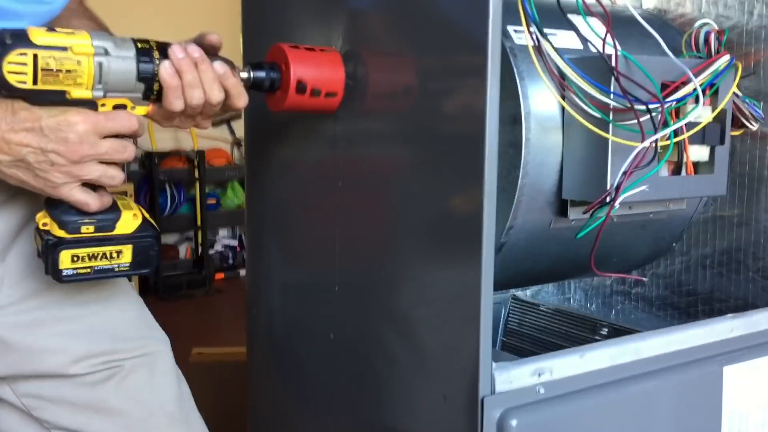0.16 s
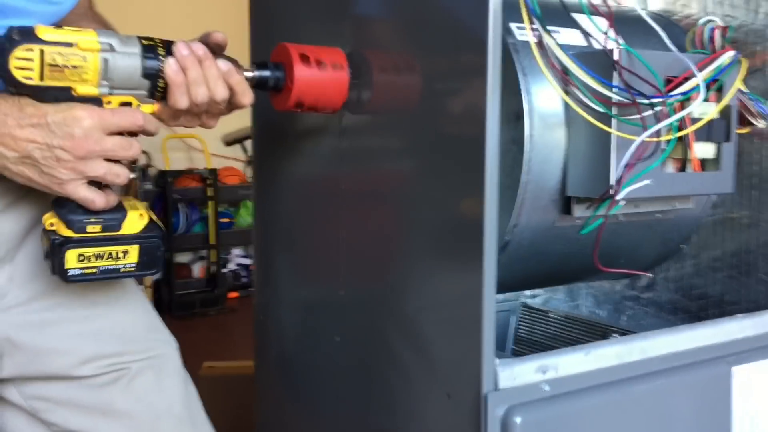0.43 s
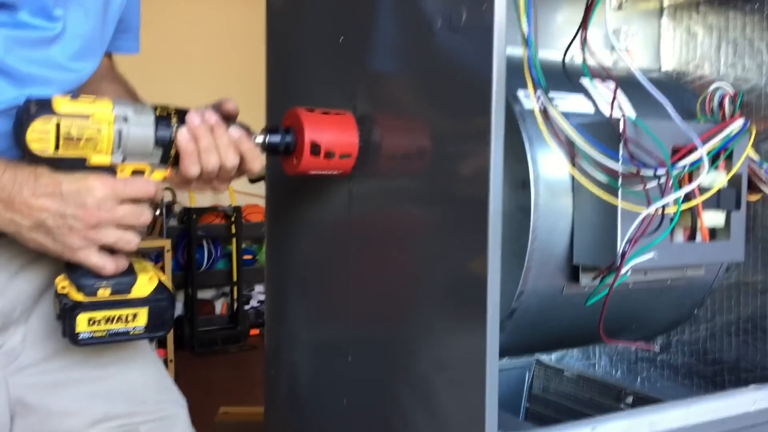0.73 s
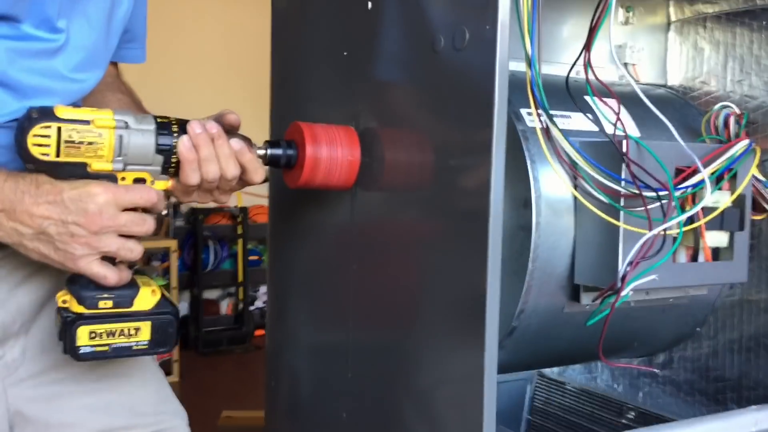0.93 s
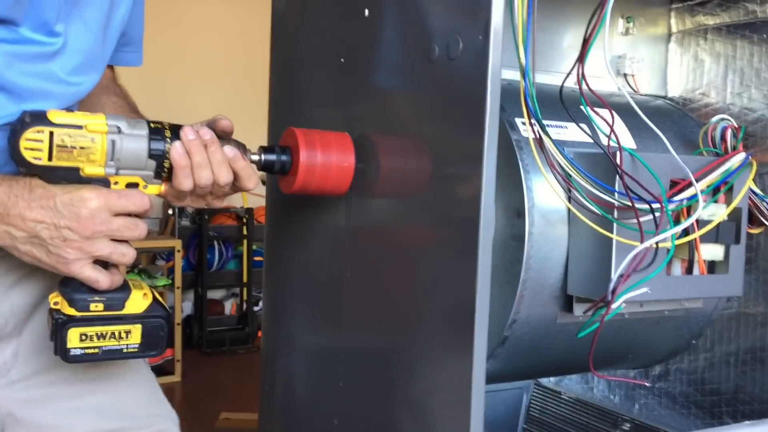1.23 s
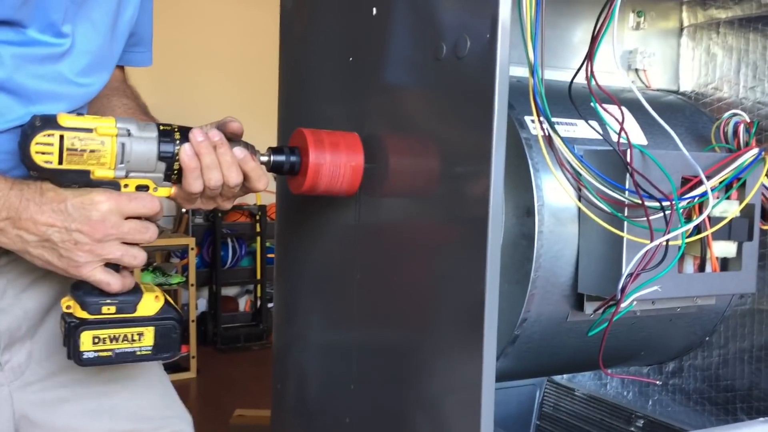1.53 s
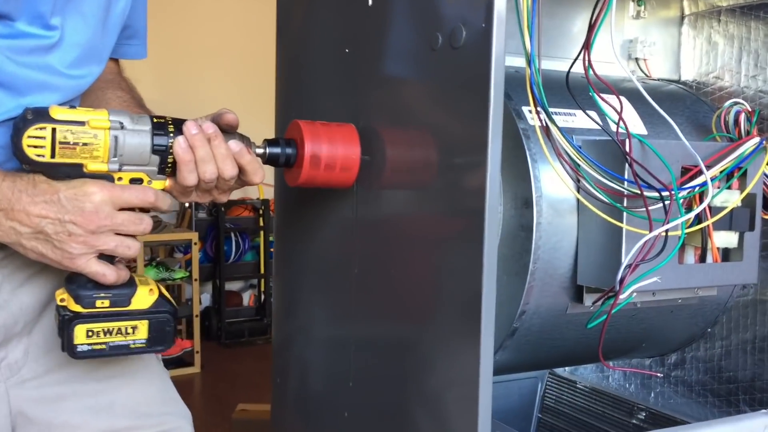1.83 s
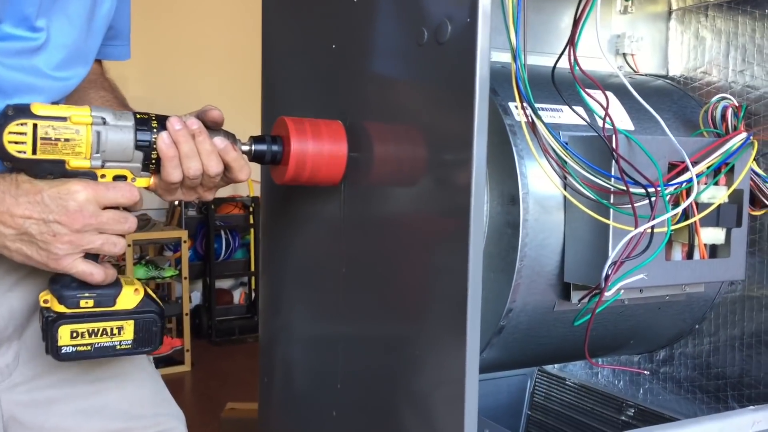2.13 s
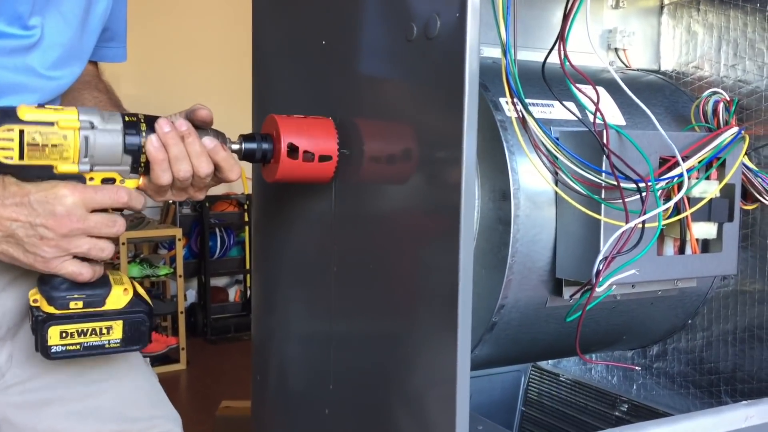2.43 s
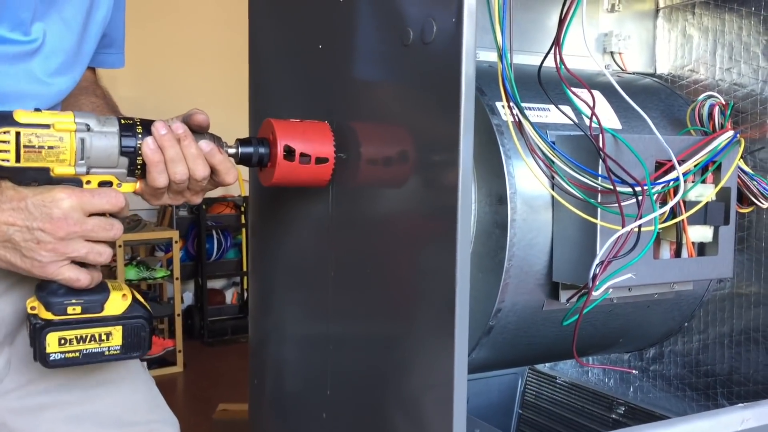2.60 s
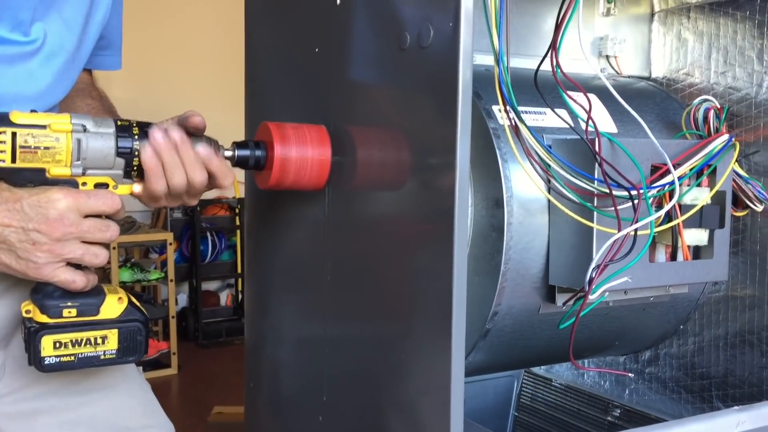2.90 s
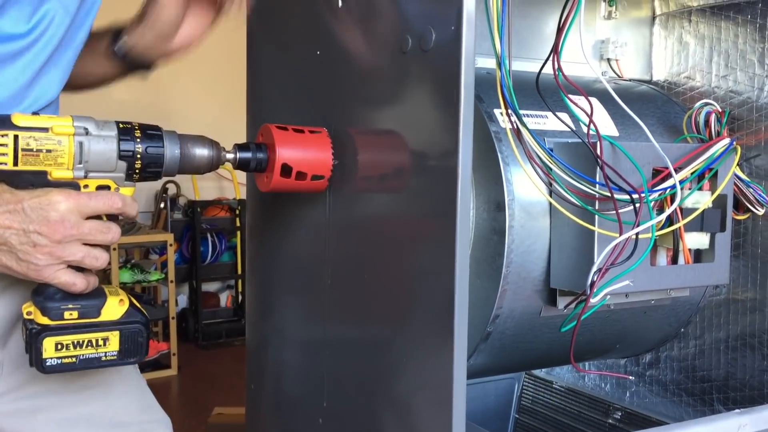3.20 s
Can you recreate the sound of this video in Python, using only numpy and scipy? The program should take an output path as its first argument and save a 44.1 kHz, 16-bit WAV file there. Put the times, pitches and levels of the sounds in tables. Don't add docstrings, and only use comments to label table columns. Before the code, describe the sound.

Cordless drill with a hole saw pulsed in short bursts beside sheet metal, with sharp clattering stops.

```python
import sys
import numpy as np
from scipy import signal
from scipy.fft import rfft, irfft
from scipy.io import wavfile

SR = 44100
rng = np.random.default_rng(int(sys.argv[2]) if len(sys.argv) > 2 else 0)


def gain_from_decibels(decibels):
    exponent = np.asarray(decibels, float) / 20
    return 10 ** exponent


def unload_audio(sound):
    columns = np.transpose(np.atleast_2d(sound))
    steps = np.round(np.clip(columns, -1, 1) * 32767)
    wavfile.write(sys.argv[1], SR, steps.astype(np.int16))


N = 147735

# f/Hz, density/dB per Hz
AIR_HUM = [(15, -45), (25, -30), (80, 11.5), (135, -20.5), (386, 3.5), (447, -48), (570, 1.5), (775, -14.5),
           (1200, 2), (1560, -53), (2640, -120)]
# f/Hz, level/dB, T60/s
DUCT_MODES = [(64, -8.5, 0.34), (107.1, -3, 0.33), (114.6, -8.5, 0.15), (171.2, -7.5, 0.31),
              (214.5, -7.5, 0.21), (272.9, -8.5, 0.16), (324.8, -3, 0.099), (420, -25, 0.059)]
# t/s, level/dB
BUMPS = [
    (2.117, -10.5),
    (2.128, -2.5),
    (2.146, -9.5),
    (2.184, -15),
]
# f/Hz, T60/s
ROOM_T60 = [(200, .3), (530, 0.3), (1390, 0.69), (3680, 0.79), (8000, 0.83), (12000, 0.46), (16000, 0.29)]
# start t/s, stop t/s, top gear-mesh f/Hz, level/dB
TRIGGER_PULLS = [(.104, 0.182, 1346, -34.5), (0.212, 0.226, 800, -26.5), (0.289, 0.491, 1630, -29.5),
                 (.677, 0.764, 703.5, -32.5), (0.784, .815, 689, -30), (0.853, 0.858, 705, -28),
                 (0.873, 1.048, 1598, -29), (1.194, 1.46, 1610, -31), (1.577, 1.911, 1653, -30),
                 (2.139, 2.484, 1640, -29.5), (2.692, 3.055, 1664, -29)]
# multiple of the mesh frequency, level/dB
MESH_OVERTONES = [(1, -7), (2, -5.5), (3, -11), (4, -11)]
# f/Hz, density/dB per Hz
GRIND_SPECTRUM = [(180, -54), (300, -13.5), (796, -15.5), (1520, -2), (1980, -9), (2890, -4.5),
                  (7660, -13.5), (9190, -13), (15600, -20)]
# f/Hz, width/Hz, lift/dB
HOUSING = [(1600, 300, 1), (3000, 400, 1), (3915, 60, 4), (4300, 500, 1.5), (9300, 1100, 4)]
# t/s, peak level/dB
CLACKS = [(.1045, -2), (.109, -6), (.2025, -4), (.22, -8), (.259, -14), (.271, -9), (.288, -5), (.297, -14),
          (.677, -3), (.785, -7), (.835, -19), (.851, -15), (.874, -17), (1.178, -20), (1.189, 6),
          (1.193, -4), (1.204, -8), (1.571, 4), (1.575, -5), (1.587, -10), (2.135, 5), (2.14, -4),
          (2.152, -9), (2.693, -7), (2.702, -10), (2.716, -11)]
# t/s, peak level/dB
THUDS = [(.485, -4), (1.0425, -7), (1.42, -5), (1.8988, -2), (2.4775, -3), (3.0495, -2)]
# t/s, peak level/dB
RATTLE = [(.498, 3), (.507, 1), (.514, 3), (1.056, 0), (1.066, -3), (1.072, 2), (1.432, 3), (1.441, 1),
          (1.448, 3), (1.911, 3), (1.92, 1), (1.927, 3), (2.490, 2), (2.499, 0), (2.506, 3), (3.062, 3),
          (3.070, 0), (3.077, 3)]
# f/Hz, density/dB per Hz
HIT_SPECTRUM = [(150, -12.5), (250, -16.5), (1190, 2.5), (2410, 3.5), (4120, 2), (4980, -3.5),
                (10100, -3.5), (14300, -5), (15600, -19)]
# f/Hz, level/dB, T60/s
CUP_MODES = [(1300, -6, .015), (2600, -3, .02), (3900, -3, .02), (5700, -6, .03), (6750, -8, .035),
             (7400, -6, .04), (8300, -6, .04), (14600, -6, .015)]
# f/Hz, width/Hz, depth/dB
DIPS = [(2000, 89, 5), (5010, 160, 7.5), (7920, 1500, 7), (10408, 1180, 9.5)]


def rms_one(x):
    return x / np.sqrt(np.mean(x ** 2) + 1e-20)


def at_hz(points, hz):
    table = np.array(points)
    return np.interp(np.log(hz), np.log(table[:, 0]), table[:, 1])


def colour(x, points, skirt_db):
    size = 8192
    hz = np.maximum(np.arange(size // 2 + 1) * SR / size, 5)
    db = at_hz(points, hz) + skirt_db * np.minimum(np.log2(hz / points[0][0]), 0)
    cepstrum = irfft(np.log(gain_from_decibels(db)))
    cepstrum[1:size // 2] *= 2
    cepstrum[size // 2 + 1:] = 0
    response = irfft(np.exp(rfft(cepstrum)))
    return signal.fftconvolve(x, response / np.sqrt(np.sum(response ** 2)))[:len(x)]


def lift(x, table, sign):
    for hz, width_hz, db in table:
        region = signal.lfilter(*signal.iirpeak(hz, hz / width_hz, SR), x)
        x = x + (gain_from_decibels(sign * db) - 1) * region
    return x


def cut(x, hz, kind):
    return signal.sosfilt(signal.butter(4, hz, kind, fs=SR, output="sos"), x)


def drift(rate_hz):
    r = np.exp(-2 * np.pi * rate_hz / SR)
    noise = rng.standard_normal(N + SR)
    return rms_one(signal.lfilter([1], [1, -2 * r, r * r], noise)[SR:])


def ring(x, hz, t60):
    r = gain_from_decibels(-60 / (t60 * SR))
    w = 2 * np.pi * hz / SR
    return signal.lfilter([0, np.sin(w)], [1, -2 * r * np.cos(w), r * r], x + 1e-18)


def bursts(rows, rise_s, fall_s):
    t, env = np.arange(N) / SR, np.zeros(N)
    for start, db in rows:
        age = np.maximum(t - start, 0)
        env += gain_from_decibels(db) * (1 - np.exp(-age / rise_s)) * np.exp(-age / fall_s)
    return env


def grains(spread_db):
    return rms_one(rng.standard_normal(N) * gain_from_decibels(spread_db * rng.standard_normal(N)))


def air_hum():
    return gain_from_decibels(-49.5) * colour(rng.standard_normal(N), AIR_HUM + [(3000, -95)], skirt_db=8)


def microphone_hiss():
    return gain_from_decibels(-61) * cut(rng.standard_normal(N), 1500, "high")


def duct():
    stir = rng.standard_normal(N)
    hum = rms_one(sum(ring(stir, hz, 0.34) for hz, _, _ in DUCT_MODES[1:5]))

    shake_db = -34
    push = np.zeros(N)
    for start, db in BUMPS + [(s, db + shake_db) for s, db in RATTLE]:
        push[int(start * SR)] = gain_from_decibels(db)
    push = signal.fftconvolve(push, np.hanning(int(0.00065 * SR)) / (0.0013 * SR))[:N]

    panel = np.zeros(N)
    for k, (hz, db, t60) in enumerate(DUCT_MODES):
        panel += gain_from_decibels(db + 2 * drift(40)) * ring(push, hz, t60) * (-1) ** k
    return panel + gain_from_decibels(-51) * hum


def room(x):
    room_db, tilt_db, build_s = -9, -0.5, 0.0013
    earlier_db = -35
    t, out = np.arange(SR) / SR, np.zeros(N)
    edges = 100 * 2. ** np.arange(0, 8, .5)
    for low, high in zip(edges, edges[1:]):
        sos = signal.butter(2, [low, min(high, 20000)], "band", fs=SR, output="sos")
        hz = np.sqrt(low * high)
        fall = gain_from_decibels(-60 * t / at_hz(ROOM_T60, hz))
        tail = fall * (1 - np.exp(-t / build_s))
        response = signal.sosfilt(sos, rng.standard_normal(SR)) * tail / np.sqrt(np.sum(tail ** 2))
        out += gain_from_decibels(room_db + tilt_db * np.log2(hz / 1000)) * signal.fftconvolve(x, response)[:N]
        earlier = fall * signal.sosfilt(sos, rng.standard_normal(SR))
        out[:SR] += gain_from_decibels(earlier_db + at_hz(HIT_SPECTRUM, hz) + 4.5) * earlier
    return out


def motor():
    head_start_s, spin_up_s, run_down_s = .045, .115, .007
    t, hz, gain = np.arange(N) / SR, np.full(N, 300.), np.zeros(N)
    for start, stop, top_hz, db in TRIGGER_PULLS:
        speed = 1 - np.exp(-(np.maximum(t - start, 0) + head_start_s) / spin_up_s)
        on = t >= start
        hz = np.where(on, top_hz * speed, hz)
        gain = np.where(on, gain_from_decibels(db) * np.exp(-np.maximum(t - stop, 0) / run_down_s), gain)
    phase = 2 * np.pi * np.cumsum(hz * (1 + .005 * drift(60.7))) / SR

    whine = np.zeros(N)
    for multiple, db in MESH_OVERTONES:
        whine += gain_from_decibels(db + 3 * drift(45)) * np.sin(round(multiple) * phase)
    whine = cut(cut(whine, 4800, "low"), 4800, "low")
    whine = signal.lfilter(*signal.butter(2, 1200, "high", fs=SR), whine)

    shaft_phase = .133 * phase
    grind = grains(3.1) * gain_from_decibels(0.5 * drift(100)) * (1 + 0.1 * np.sin(shaft_phase))
    shaft = gain_from_decibels(-27 + 9 * (t > 2.13) + 4 * drift(25)) * np.sin(shaft_phase)
    hiss = gain_from_decibels(2) * (hz / 1600) ** 2 * cut(grains(3.0), 8200, "high")
    housed = lift(colour(grind, GRIND_SPECTRUM, skirt_db=30) + whine, HOUSING, 1)
    return gain * (housed + shaft + hiss)


def clatter():
    chatter_lag_s, chatter_s = .013, .021
    t, loose = np.arange(N) / SR, np.zeros(N)
    for stop, _ in THUDS:
        age = t - stop - chatter_lag_s
        loose += (age > 0) * np.exp(-(age / chatter_s) ** 6)

    env = gain_from_decibels(-6.5) * bursts(CLACKS, 0.00048, .002)
    env += gain_from_decibels(-8) * bursts(RATTLE, 0.00044, .0015)
    env += gain_from_decibels(-16.5 + 1.07 * drift(310)) * loose
    contacts = env * rng.choice([-1, 1], N) * gain_from_decibels(4 * rng.standard_normal(N))

    crack = gain_from_decibels(-4.5) * cut(bursts(CLACKS + RATTLE, .0003, .0006) * grains(4.0), 7000, "high")
    cup = sum(gain_from_decibels(db - 34) * ring(contacts, hz, t60) for hz, db, t60 in CUP_MODES)
    dull = signal.butter(2, [800, 4000], "band", fs=SR, output="sos")
    thud = gain_from_decibels(4) * signal.sosfilt(dull, bursts(THUDS, .0004, .0025) * grains(2.5))
    return colour(contacts, HIT_SPECTRUM, skirt_db=-4) + cup + thud + crack


def scene():
    drill = motor() + clatter()
    mono = drill + room(drill) + duct() + air_hum() + microphone_hiss()
    return np.array([mono, mono])


def low_pass(x):
    return signal.sosfilt(signal.butter(12, 16460, fs=SR, output="sos"), x)


def record(dry):
    clip_top = 2.53
    x = lift(cut(dry, 48, "high"), DIPS, -0.64)
    x = clip_top * np.tanh(x / clip_top)
    x = signal.sosfilt(signal.cheby2(16, 50, 16350, fs=SR, output="sos"), x)
    return low_pass(x)


dry = scene()
out = record(dry)
unload_audio(out)
```